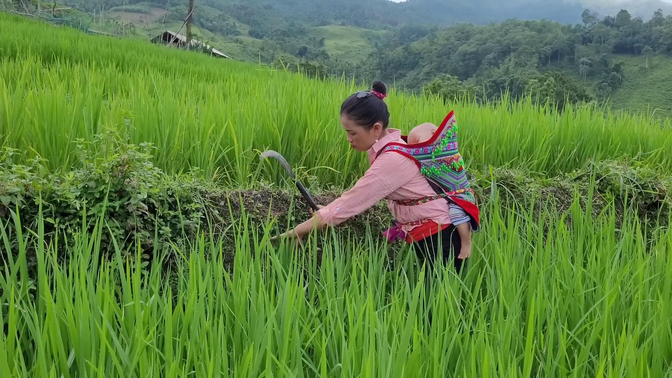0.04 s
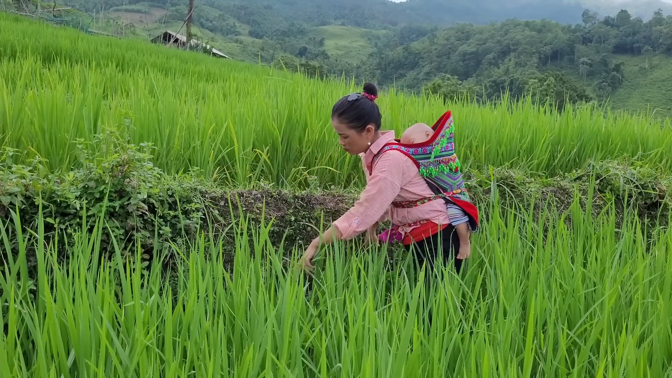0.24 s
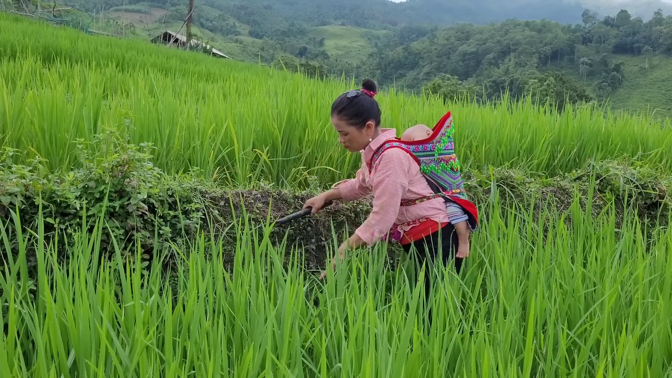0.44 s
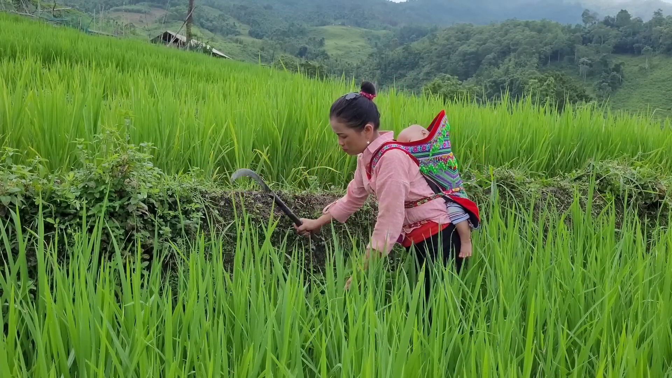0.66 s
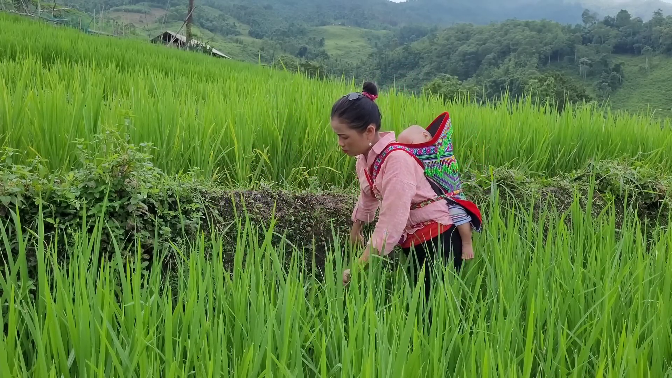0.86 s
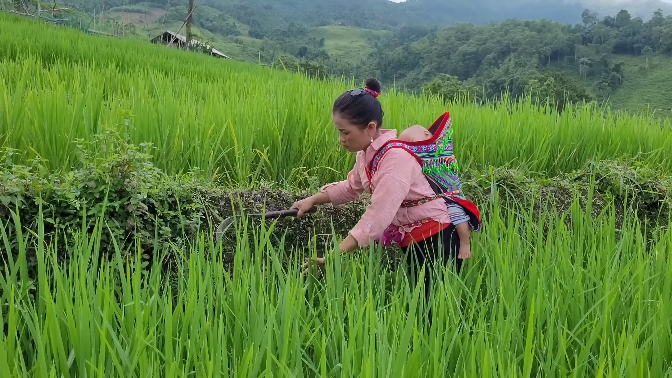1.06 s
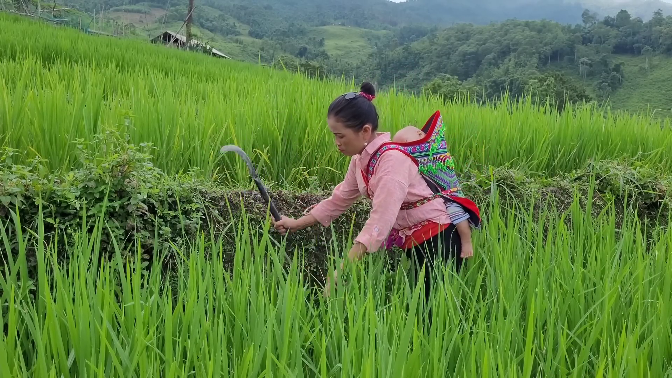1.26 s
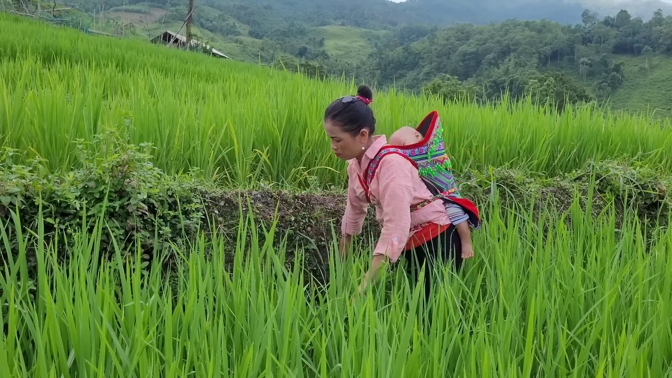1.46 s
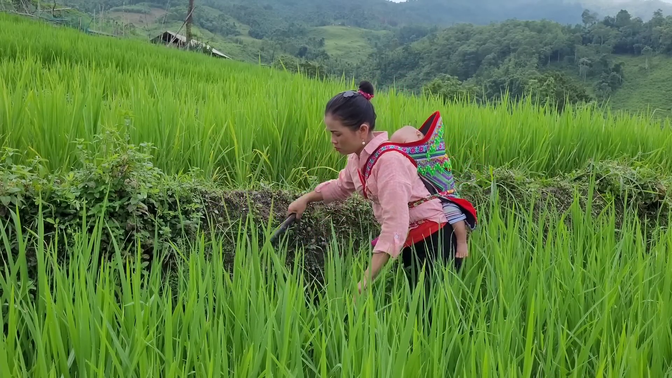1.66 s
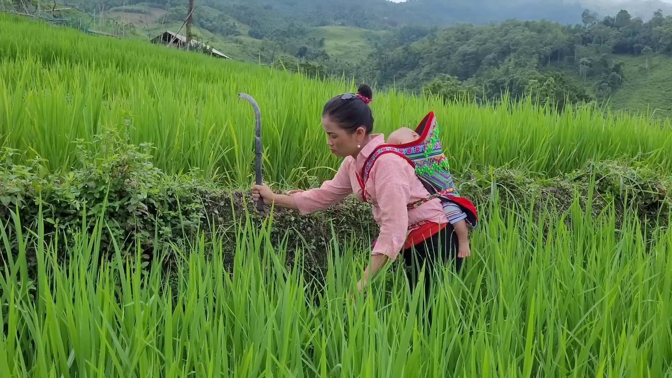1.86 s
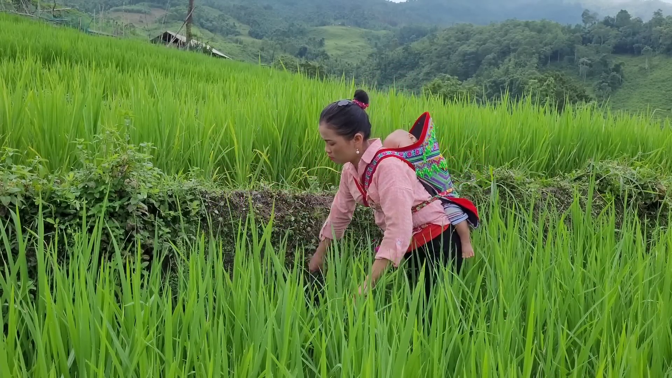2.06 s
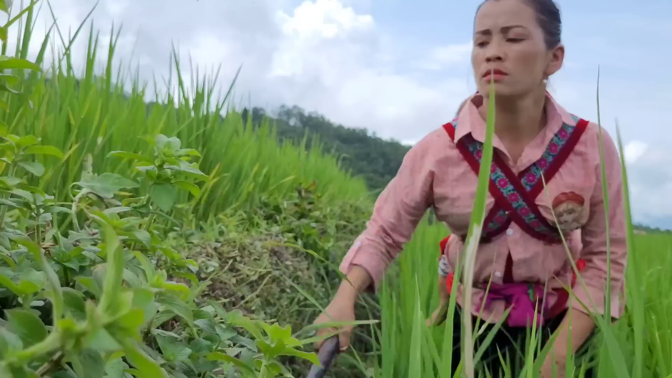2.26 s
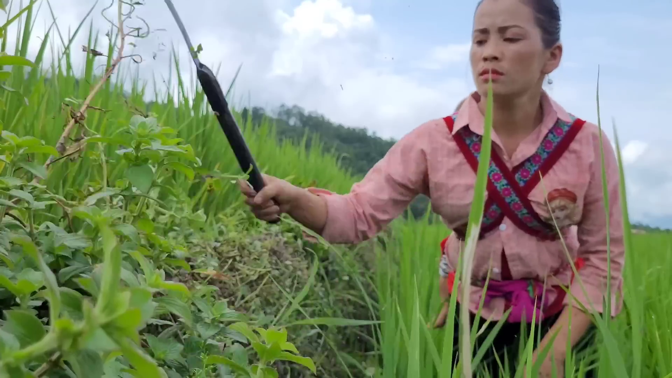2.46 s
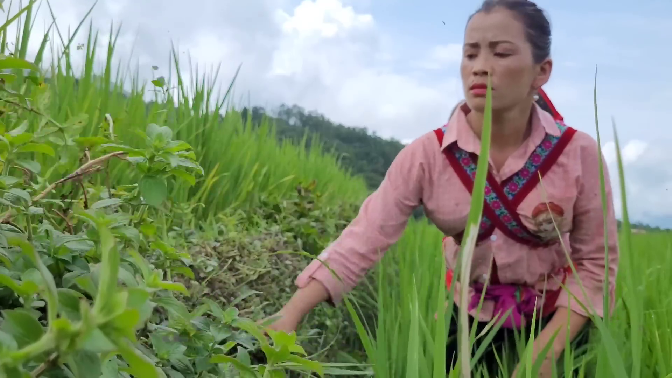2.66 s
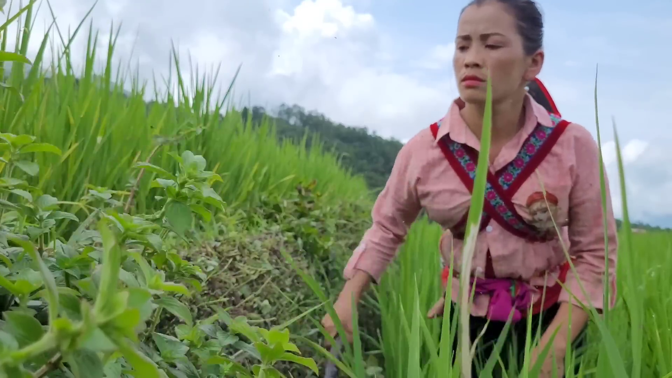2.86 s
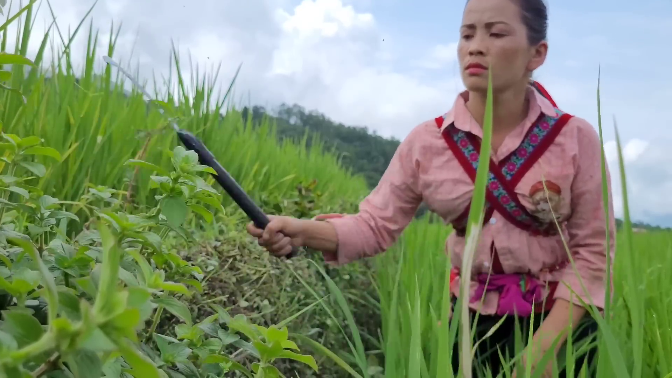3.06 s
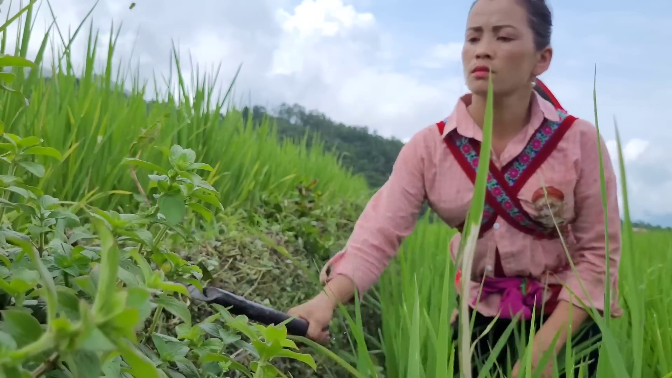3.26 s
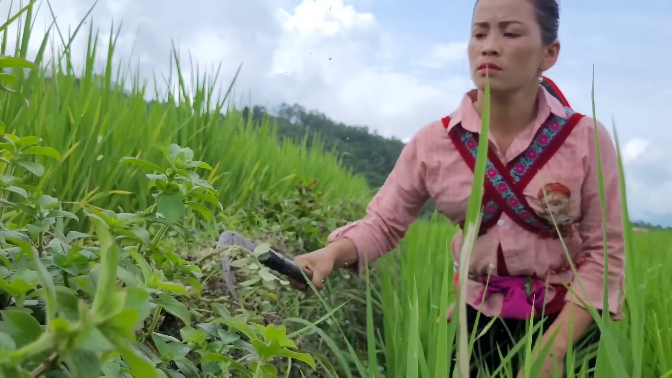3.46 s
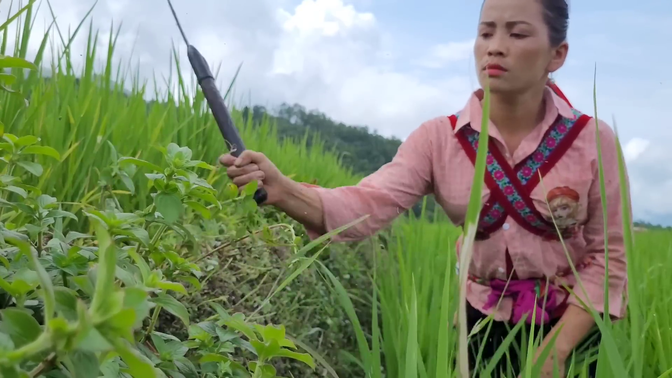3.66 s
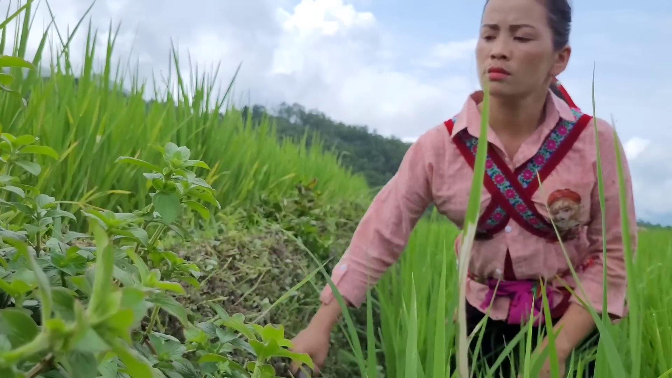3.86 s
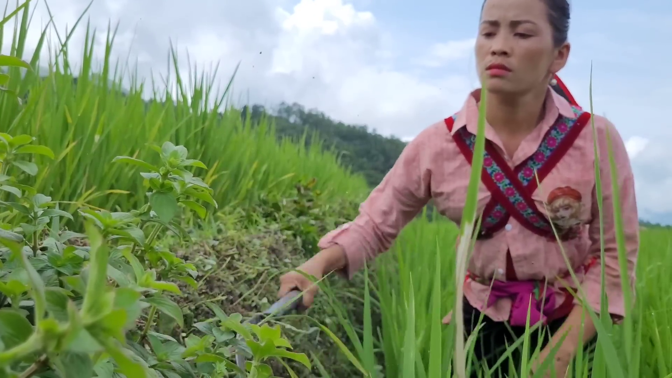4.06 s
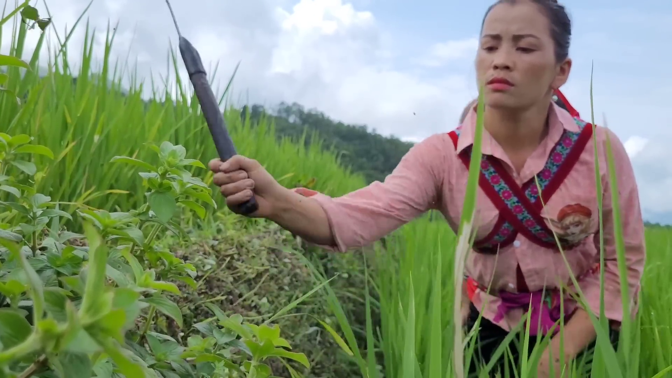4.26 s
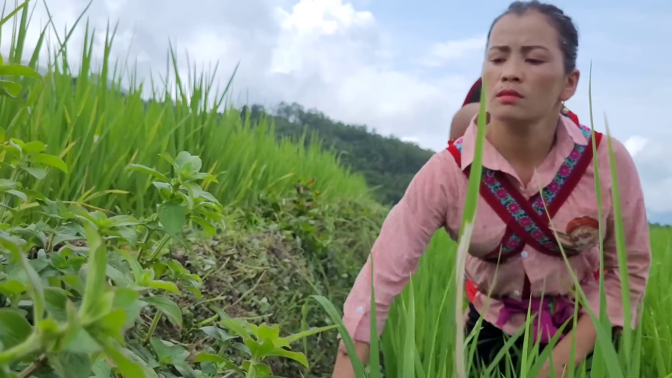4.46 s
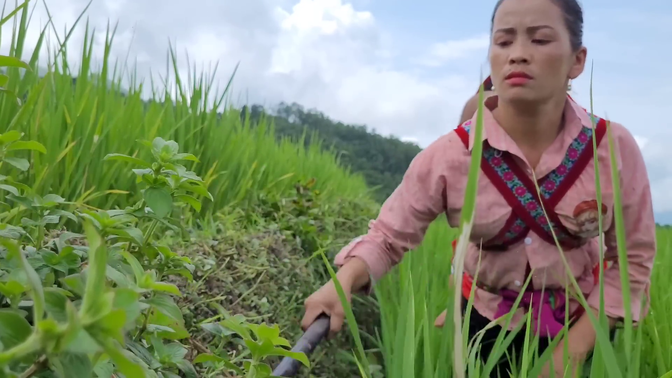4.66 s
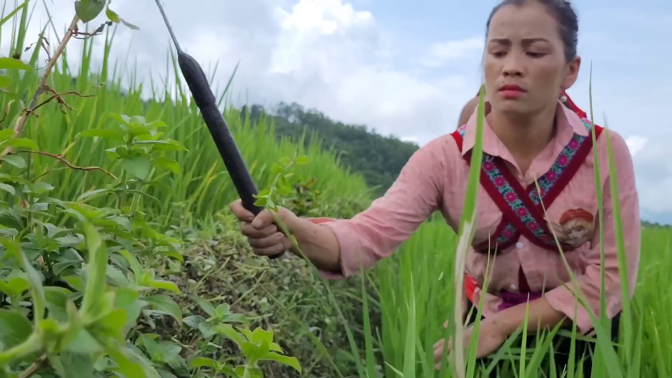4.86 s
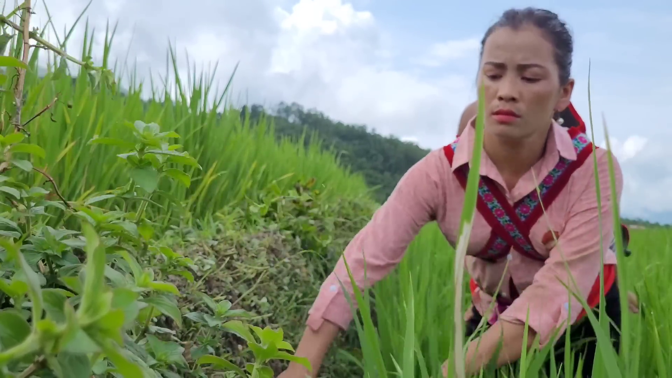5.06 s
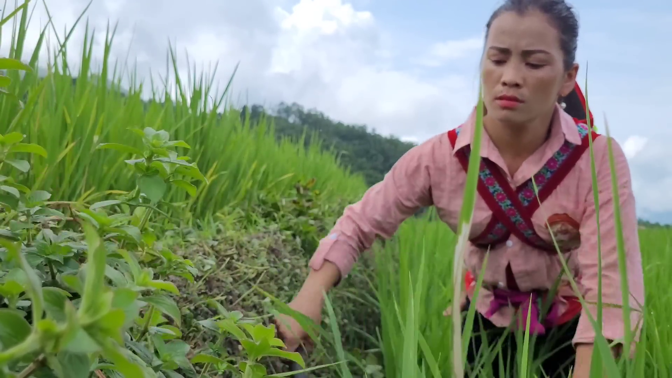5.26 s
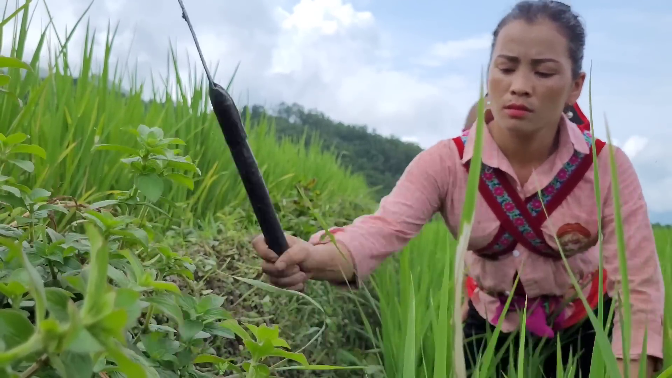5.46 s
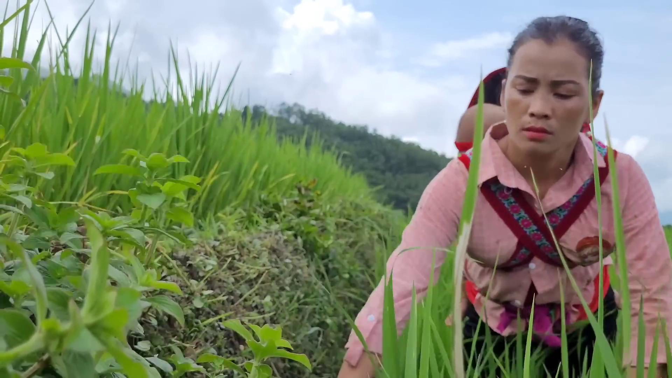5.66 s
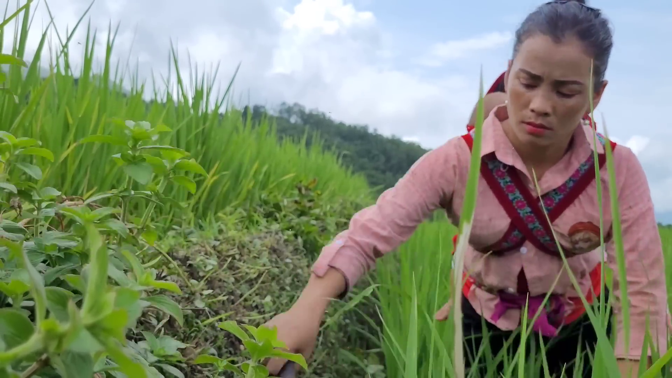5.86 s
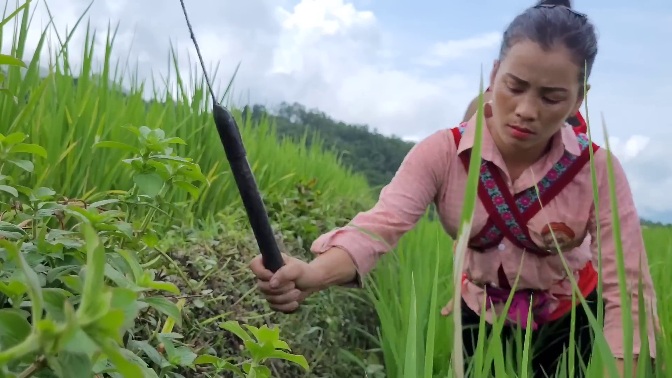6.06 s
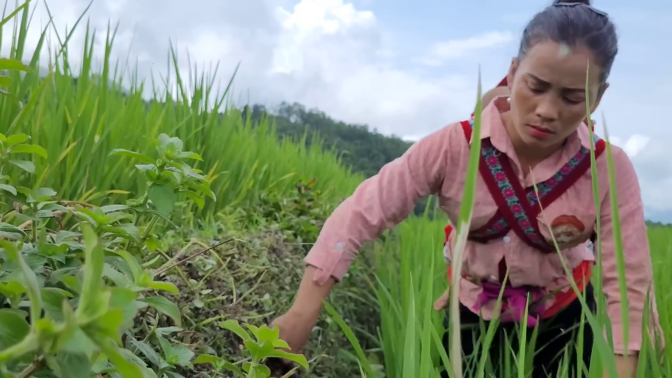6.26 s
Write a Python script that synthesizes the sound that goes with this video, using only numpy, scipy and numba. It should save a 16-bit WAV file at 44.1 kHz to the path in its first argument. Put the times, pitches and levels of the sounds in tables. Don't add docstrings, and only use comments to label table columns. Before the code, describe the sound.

Steady blade strokes rip through stems beside a flooded field. Each is a sharp, short tearing crunch of many tiny snaps, often with a brief metallic ping, followed by leaves settling. After about two seconds a cut brings the microphone near; strokes become brighter, low puffs of air bump it, mud sloshes, drops plop, and a small bird chirps faintly in the open, dry air.

```python
import sys
import numpy as np
from scipy import signal
from scipy.io import wavfile
from scipy.ndimage import uniform_filter1d
from numba import njit

SR = 44100
rng = np.random.default_rng(int(sys.argv[2]) if len(sys.argv) > 2 else 0)


def convert_level_to_amplitude(level_db):
    exponent = np.asarray(level_db, float) / 20
    return 10 ** exponent


def master(y):
    cut = np.clip(np.atleast_2d(y).T, -1, 1)
    pcm = np.round(cut * 32767)
    wavfile.write(sys.argv[1], SR, pcm.astype(np.int16))


N = 278271

CHANGE_S = 2.4
NEAR = np.arange(N) > CHANGE_S * SR
# start_s, peak_db, pitch_hz, eddies_db (rms of the eddies after it)
THUMPS = [(0.188, -42, 103, -62), (.823, -53, 99.6, -59), (1.433, -40, 70, -66), (2.049, -54, 89.5, -61),
          (2.777, -44, 87, -46.5), (3.324, -27, 108.5, -41), (3.884, -19.5, 82, -50),
          (4.488, -30, 88.5, -40.5), (5.118, -38, 102, -42), (5.711, -23.5, 81, -44),
          (6.269, -29, 61.9, -50)]


def read(table, hz):
    f, v = np.transpose(table)
    return np.interp(np.log(hz), np.log(np.maximum(f, 1)), v)


def walk(rate_hz):
    k = int(SR / rate_hz)
    held = np.repeat(rng.standard_normal(N)[:N // k + 1], k)
    return 1.114 * uniform_filter1d(held, k)[:N]


def swell(start_s, rise_ms, t60_s, hold_s=0.0):
    sag_db_per_s = 36
    i, rise_s = int(start_s * SR), rise_ms / 1000
    u = np.arange(min(int((rise_s + hold_s + t60_s) * SR), N - i)) / SR
    sag_db = sag_db_per_s * np.clip(u - rise_s, 0, hold_s)
    decay_db = 60 * np.maximum(u - rise_s - hold_s, 0) / t60_s
    rise = np.sin(np.pi / 2 * np.clip(u / rise_s, 0, 1)) ** 1.14
    return i, rise * convert_level_to_amplitude(-sag_db - decay_db)


def pile(rows, base):
    power = base + np.zeros(N)
    for start_s, db, *form in rows:
        i, shape = swell(start_s, *form)
        power[..., i:i + len(shape)] += (convert_level_to_amplitude(db) * shape) ** 2
    return power


def stir():
    field_far = (-65, -53.5, -59.5)
    field_near = (-57.5, -58, -59.5)
    # start_s, high_band_db (rms), rise_ms, t60_s
    rustles = [(.17, -44.5, 50, 1.05), (.36, -45.5, 37, 2.8), (.58, -45, 160, 2.2), (.8, -44.5, 120, 1.9),
               (.96, -46.5, 80, 1.2), (1.1, -48.5, 100, 1.8), (1.26, -46, 91, 2), (1.42, -47, 110, 0.81),
               (1.55, -49, 126, 0.36), (2.35, -47, 16, 0.18), (2.03, -41, 70, 0.71), (2.405, -43, 38, 1.33),
               (2.62, -48, 60, 1.4), (2.77, -36.5, 55, 0.57), (2.93, -49.5, 140, 0.38),
               (3.245, -46, 52, 0.13), (3.32, -40.5, 59, 0.94), (3.45, -52.5, 160, 3.2),
               (3.89, -36.5, 83, 1.22), (4.3, -48, 69, 1.1), (4.49, -29, 55, 0.62), (4.6, -40.5, 165, 3),
               (4.8, -46.5, 160, 1.8), (5.12, -28, 45, 0.99), (5.23, -36, 116, 0.95), (5.55, -46, 220, 1.1),
               (5.72, -33, 69, 0.78), (6.27, -37, 40, 1.1)]
    # start_s, level_db (rms), rise_ms, t60_s
    sloshes = [(0., -54.5, 76, 4.6), (.95, -71, 100, 0.55), (1.62, -53, 40, 1.9), (1.9, -58, 17, 0.69),
               (2.41, -46, 46, 1.3), (2.6, -48, 120, 2.1), (3.15, -56.5, 47, 1.5), (3.5, -57, 66, 2.6),
               (3.8, -49.5, 100, 1.4), (4.03, -47, 88, 0.73), (4.3, -55, 73, 1.5), (4.7, -50.5, 37, 0.97),
               (4.95, -54, 62, 1.5), (5.5, -51.5, 47, 1.3)]
    leaf_low_db, leaf_middle_db = -11, -4
    eddy_rise_ms, eddy_t60_s, breeze_db = 20, 0.41, -65.5
    pause_s, pause_depth_db = 0.031, -8.5

    field_db = np.where(NEAR, np.array(field_near)[:, None], np.array(field_far)[:, None])
    leaves = pile(rustles, 0) * convert_level_to_amplitude(2 * np.array([[leaf_low_db], [leaf_middle_db], [0]]))
    leaves[0] += pile(sloshes, 0)
    t = np.arange(N) / SR
    pause_db = pause_depth_db * np.exp(-((t - CHANGE_S + pause_s) / pause_s) ** 2)
    rows = [(s, db, eddy_rise_ms, eddy_t60_s) for s, _, _, db in THUMPS]
    eddies = pile(rows, convert_level_to_amplitude(2 * breeze_db))
    leaf_db = 10 * np.log10(convert_level_to_amplitude(2 * field_db) + leaves) + pause_db
    return leaf_db, 10 * np.log10(eddies) + pause_db


def bird():
    # start_s, length_s, start_hz, end_hz, level_db (rms)
    peeps = [
        (2.45, 0.061, 4770, 4860, -52),
        (3.407, 0.018, 4900, 4650, -43),
        (4.224, 0.12, 4560, 4700, -53),
        (4.415, .02, 4640, 4800, -50),
        (4.462, 0.022, 4700, 4900, -44),
        (4.377, 0.019, 4500, 4550, -53),
        (4.456, .009, 2300, 2200, -48),
        (5.04, .03, 4600, 4750, -54),
        (5.572, .05, 4370, 4770, -54),
        (5.655, .02, 4540, 4700, -54),
    ]
    out = np.zeros(N)
    for start_s, length_s, start_hz, end_hz, db in peeps:
        i, u = int(start_s * SR), np.arange(int(length_s * SR)) / (length_s * SR)
        hz = end_hz + (start_hz - end_hz) * (1 - u) ** 2
        tone = np.sin(2 * np.pi * np.cumsum(hz) / SR)
        out[i:i + len(u)] += convert_level_to_amplitude(db) * np.sqrt(2 * np.sin(np.pi * u)) * tone
    return out * convert_level_to_amplitude(np.array([[-2.5], [2.5]]))


def air(air_db):
    low_hz, top_hz, unlike = 45, 110, 0.29
    rise_ms, t60_s = 20, 0.15
    sag_per_s, noise_share = 3.8, 0.25
    band = signal.butter(2, [low_hz, top_hz], "band", fs=SR, output="sos")
    mid, side = signal.sosfilt(band, rng.standard_normal((2, N)))
    gust = (mid + unlike * side * np.array([[1], [-1]])) / np.std(mid)
    out = gust * convert_level_to_amplitude(air_db + 2.0)
    for start_s, db, pitch_hz, _ in THUMPS:
        i, shape = swell(start_s, rise_ms, t60_s)
        span = slice(i, i + len(shape))
        hz = pitch_hz * np.exp(-sag_per_s * np.arange(len(shape)) / SR)
        push = np.sin(2 * np.pi * np.cumsum(hz) / SR) + noise_share * gust[:, span]
        out[:, span] += convert_level_to_amplitude(db - 4.5) * shape * push
    return out * convert_level_to_amplitude(np.array([[-0.6], [0.6]]))


def drops():
    # start_s, peak_db, pitch_hz, t60_s
    plops = [(.082, -40, 686, 0.042), (1.264, -37, 2720, .03), (1.825, -36, 1490, 0.017),
             (1.909, -34, 1790, 0.02), (2.2115, -32, 682, 0.093), (2.365, -42, 1260, 0.046),
             (2.685, -40, 1490, 0.056), (2.857, -23.5, 756, 0.09), (2.899, -41, 536, 0.13),
             (3.145, -29.5, 1330, 0.012), (3.286, -39, 1580, 0.032), (3.643, -36.5, 1660, 0.036),
             (3.819, -34.5, 1450, 0.04), (4.386, -39, 1530, .055), (4.399, -35.5, 2170, 0.028),
             (4.817, -47, 1900, .049), (4.874, -27, 2270, 0.017), (4.962, -38, 2420, .065),
             (5.011, -39, 2600, 0.12), (5.248, -21.5, 1010, .022), (5.834, -26, 1414, .04),
             (3.835, -36, 315, 0.087), (6.044, -43, 560, .06), (6.131, -49, 1400, .06)]
    pan_db, glide = -6.5, 0.061
    out = np.zeros(N)
    for start_s, db, hz, t60_s in plops:
        i, shape = swell(start_s, 2.6, t60_s)
        u = np.arange(len(shape)) / SR
        ringing = np.sin(2 * np.pi * hz * (u + glide * u ** 2 / t60_s))
        out[i:i + len(u)] += convert_level_to_amplitude(db - 3.0) * shape * ringing
    return out * convert_level_to_amplitude(np.array([[pan_db], [-pan_db]]) / 2)


def cracks():
    # start_s, peak_db, pitch_hz
    splits = [(2.0612, -5, 4100), (2.0625, -11, 3300), (3.8865, -10, 5800), (3.922, -15, 1400),
              (3.903, -14, 500), (5.7138, -9, 4900), (5.7138, -11, 1100), (5.7238, -10, 4700),
              (5.7238, -10, 1300), (5.741, -10, 500), (5.708, -14, 1000), (5.7605, -13, 700),
              (3.3245, -13, 900), (3.328, -14, 1000), (3.3245, -17, 5400), (4.4785, -11, 2500),
              (4.501, -7, 450), (4.508, -9, 2100), (4.5205, -9, 500), (4.521, -12, 2200),
              (2.7655, -10, 1500), (2.0315, -12, 900), (.1838, -15, 2700), (.1975, -17, 320),
              (.8005, -19, 2850), (.8318, -16, 3300), (.8348, -16, 1200), (.846, -17, 3900),
              (1.4052, -15, 1360), (1.411, -14, 3100), (1.4275, -13, 5700), (1.4412, -11, 3200),
              (1.4405, -14, 800), (1.452, -16, 700), (5.104, -12, 500), (5.113, -9, 4100),
              (5.126, -12, 2350), (6.2735, -12, 600), (6.2862, -11, 2100), (6.293, -12, 900)]
    pan_db, rise_ms, t60_s = -1.0, 0.3, 0.005
    out = np.zeros(N)
    for start_s, db, hz in splits:
        i, shape = swell(start_s, rise_ms, t60_s)
        swing = np.sin(2 * np.pi * hz * np.arange(len(shape)) / SR)
        out[i:i + len(shape)] -= convert_level_to_amplitude(db) * shape * swing
    return out * convert_level_to_amplitude(np.array([[pan_db], [-pan_db]]) / 2)


def blade():
    # start_s, peak_db, pitch_hz, t60_s
    pings = [(0.181, -13, 2670, 0.045), (0.8305, -24, 3600, 0.025), (1.424, -6, 2700, 0.025),
             (1.437, -4, 2930, 0.025), (2.0303, -13, 3100, 0.018), (2.0594, -8, 7450, 0.02),
             (2.0602, -2, 3660, 0.037), (2.7282, -25, 4630, 0.025), (3.8854, -11, 5660, 0.028),
             (4.4835, 2.5, 6030, 0.024), (4.4895, -3, 5900, 0.02), (5.112, 3.5, 6110, 0.034),
             (6.2726, -21, 4130, 0.025)]
    pan_db, spread = 1.5, 0.058
    out = np.zeros(N)
    detunes = rng.standard_normal((len(pings), 3, 1))
    for (start_s, db, hz, t60_s), detune in zip(pings, detunes):
        i, shape = swell(start_s, 0.3, 0.93 * t60_s)
        u = np.arange(len(shape)) / SR
        modes = np.sin(2 * np.pi * hz * (1 + spread * detune) * u)
        out[i:i + len(shape)] += convert_level_to_amplitude(db - 13.5) * shape * modes.sum(axis=0)
    return np.array([out * convert_level_to_amplitude(pan_db / 2), np.roll(out, 5) * convert_level_to_amplitude(-pan_db / 2)])


def tearing():
    # start_s, peak_db, hold_s (time in the weeds), t60_s, low_db (re middle band)
    strokes = [(0.171, -19.5, 0.018, 0.27, -6.5), (0.781, -21.5, 0.068, 0.088, -10.5),
               (1.4, -15.5, 0.064, 0.14, -8.5), (2.028, -15, 0.026, 0.076, -2.5),
               (2.754, -10.5, 0.025, 0.23, -5.5), (3.318, -17, 0.007, 0.025, -5),
               (3.879, -11, 0.0043, 0.18, -4.5), (4.475, -8.5, 0.036, 0.084, -5),
               (5.098, -13, 0.047, 0.31, -5), (5.701, -13.5, 0.051, 0.17, -4), (6.264, -9, 0.017, 0.17, -6)]
    # start_s, peak_db, low_db, high_db (re middle band)
    bunches = [(0.153, -29, -2, -6), (.166, -30, -10, -1), (0.203, -23, -8, -4), (5.09, -25, -10, -3),
               (2.745, -28, -8, 2), (0.191, -18, -10, -9), (0.417, -29, -11, -8), (0.8, -17, -19, -5),
               (0.824, -17.5, -0.5, -8), (1.423, -13, -6.5, -1), (1.452, -29, -12, -3),
               (2.031, -20, 2, 8.5), (2.109, -25, -3.5, -9), (2.411, -38.5, -11, 2), (2.724, -25, -2, 3.5),
               (2.762, -8, -3, 3), (2.782, -12, -18, -5), (3.022, -40.5, 0, 9.5), (3.309, -29, -2, -2),
               (3.3225, -15, 2, 0), (5.694, -32, -3, 0), (3.44, -31.5, -1, 5.5), (3.9, -26, -2, -6),
               (3.914, -22, -1, -8), (3.876, -30, -3, -3), (4.495, -8, -1.5, 4), (5.106, -11.5, 0, 3.5),
               (5.121, -7.5, -7, -4), (5.164, -20, -15, 1), (5.193, -18, -18, 4), (5.711, -12.5, 0, 3.5),
               (5.737, -13.5, -2.5, 2), (5.764, -23.5, -5, 7), (6.236, -35, -6, 8), (6.243, -25.5, -3, 4),
               (6.252, -21, -6, -3), (6.29, -16, -9, 0)]
    # start_s, peak_db, low_db, high_db (re middle band)
    ticks = [(0.181, -13.5, -11, -6), (2.212, -46, -9, -8), (2.7635, -18, -11, 0), (3.839, -39, -7, 4),
             (4.477, -13, -8, 0), (5.41, -24.5, -4.5, -4), (5.47, -37, -2, 12.5), (5.2, -26, -6, 0),
             (5.3, -30, -5, 0), (5.355, -30, -8, 0), (4.7, -34, -8, 2), (4.775, -34, -8, 2),
             (6.2535, -23.5, -8, 5), (0.449, -26.5, -11, -3), (0.951, -30.5, 1, -27), (1.0162, -33, -1, 6),
             (1.783, -41, -21, 8.5), (1.9794, -49, -21, -8), (2.059, -6.5, -30, -2), (2.3638, -40.5, 0, 6),
             (2.533, -30.5, -2, 8), (3.1416, -36.5, -2, -2), (3.2714, -52, -9, -5), (3.699, -44, -12, 12),
             (4.143, -29, -7, 1.5), (4.41, -28, -22, -0.5), (4.819, -26.5, -19, -2), (4.964, -35, -8, 9)]
    far_high_db, near_high_db = -1.5, 0.5
    bite_ms, crest_db = 8.8, -9
    bunch_rise_ms, bunch_t60_s = 4.4, 0.12
    tick_rise_ms, tick_t60_s = 0.69, 0.058
    brush_db, brush_ms = -17, 3.8

    def bands(db, low_db, high_db):
        return db + crest_db + np.array([[low_db], [0], [high_db]])

    rows = []
    for start_s, db, hold_s, t60_s, low_db in strokes:
        high_db = near_high_db if start_s > CHANGE_S else far_high_db
        rows.append((start_s, bands(db, low_db, high_db), bite_ms, t60_s, hold_s))
    rows += [(s, bands(*levels), bunch_rise_ms, bunch_t60_s) for s, *levels in bunches]
    rows += [(s, bands(*levels), tick_rise_ms, tick_t60_s) for s, *levels in ticks]
    power = pile(rows, np.full((3, 1), 1e-14))
    keep = np.exp(-1000 / (brush_ms * SR))
    ahead = signal.lfilter([1 - keep], [1, -keep], power[:, ::-1])[:, ::-1]
    return 10 * np.log10(power + convert_level_to_amplitude(2 * brush_db) * ahead)


def shaped(colour, band_db, hz):
    # low_hz, high_hz
    bands_hz = [(150, 1000), (1000, 4000), (4000, 15500)]
    own_db = []
    for low_hz, high_hz in bands_hz:
        density = convert_level_to_amplitude(2 * read(colour, np.linspace(low_hz, high_hz, num=200)))
        own_db.append(10 * np.log10(np.mean(density) * (high_hz - low_hz)))
    lift_db = band_db - np.array(own_db)[:, None]
    place = np.interp(np.log(hz), np.log([600, 1500, 3000, 5500]), [0, 1, 1, 2])
    share = np.clip(1 - np.abs(place - np.arange(3)[:, None]), 0, 1)
    return read(colour, hz) + (share * lift_db).sum(axis=0)


@njit
def ring(start, pole, onset, left, right, floor):
    out = np.zeros((2, N))
    for k in range(len(start)):
        z, lack, i = 1 + 0j, 1., start[k]
        while i < N and z.real * z.real + z.imag * z.imag > floor:
            out[0, i] += (1 - lack) * (z * left[k]).imag
            out[1, i] += (1 - lack) * (z * right[k]).imag
            z *= pole[k]
            lack *= onset[k]
            i += 1
    return out


def weeds(leaf_db):
    # pitch_hz, density_db (per Hz)
    tear_far, tear_near = [(59, -37), (100, -22), (259, -1.5), (441, -24), (764, -6.5), (1860, -5),
                           (2110, -10), (3160, -1.5), (6490, -2.5), (12000, -3.5), (15800, -8.5)], [(59, -37), (100, -14.5), (271, 7.5), (832, -2), (965, -10),
                                             (1470, -11), (2250, -12.5), (3160, -20), (3440, -12),
                                             (5960, -13), (6630, -16.5), (14800, -14), (15800, -40)]
    leaf_far, leaf_near = [(59, -40), (100, 3.5), (219, 9), (748, 3), (965, -9), (1820, -10), (2160, -16),
                           (2840, -9.5), (6630, -17.5), (12500, -17.5), (15800, -23)], [(59, -42), (100, -24), (249, -4), (396, -13), (780, -8.5),
                                             (1030, -34), (1220, -5), (2350, -5.5), (2960, -6.5),
                                             (4620, -7), (9500, -12.5), (12000, -5.5), (15800, -15.5)]
    # pitch_hz, balance_db (left minus right)
    pan_far, pan_near = [(60, -3), (110, -5), (200, 5), (380, -6), (700, -5.5), (1290, -2.5), (2380, -0.5),
                         (4400, -4), (8120, 1.5), (15000, 0.5)], [(60, -3), (110, -5), (200, 4.5), (380, -1.5), (700, 0),
                                          (1290, -3.5), (2380, -5), (4400, -4.5), (8120, 1.5),
                                          (15000, -1.5)]
    snaps_per_s, cycles = 36000, 1.405
    tear_scatter_db, leaf_scatter_db = 1.5, 2.8
    crackle_db, flutter_db = 1.4, 1.0

    count = int(snaps_per_s * N / SR)
    when, pitch, odd, phase, long = rng.random((count, 5)).T
    side, wide = rng.standard_normal((count, 2)).T
    start, hz = (when * N).astype(np.int64), 100 + pitch * 15700
    near = NEAR[start]
    rare = np.minimum(-np.log(1 - odd), 2.8) - 1

    tear_db = tearing()[:, start]
    tear = np.where(near, shaped(tear_near, tear_db, hz), shaped(tear_far, tear_db, hz))
    tear += crackle_db * np.clip(walk(700), -1.8, 1.8)[start]
    fall_db = leaf_db[:, start]
    leaf = np.where(near, shaped(leaf_near, fall_db, hz), shaped(leaf_far, fall_db, hz))
    leaf += flutter_db * walk(60)[start]
    density = convert_level_to_amplitude(2 * (tear + tear_scatter_db * rare))
    density += convert_level_to_amplitude(2 * (leaf + leaf_scatter_db * rare + 2.0))

    tau_s = cycles * (0.5 + long) * (hz / 1000) ** 0.23 / hz
    size = np.sqrt(density * 15700 * 9 / (snaps_per_s * tau_s)) * np.exp(2j * np.pi * phase)
    lag_s = np.where(near, 1.1e-4, 4e-5) + 4e-5 * side + 9e-5 * walk(120)[start]
    pan_db = np.where(near, read(pan_near, hz), read(pan_far, hz))
    pan_db += 8.0 * wide * np.clip(hz / 2200, 0.05, 1)
    pan = convert_level_to_amplitude(pan_db / 2)
    pole = np.exp(2j * np.pi * hz / SR - 1 / (tau_s * SR))
    onset = np.exp(-3 / (tau_s * SR))
    left = size * pan * np.exp(2j * np.pi * hz * lag_s)
    return ring(start, pole, onset, left, size / pan, 1e-3)


def placed(x):
    low_hz, hollow_hz, hollow_width_hz = 130, 3300, 1100
    left_depth, right_depth = 0.068, 0.73
    slot_width_hz, slot_depth = 220, 0.35
    x = signal.sosfilt(signal.butter(3, low_hz, "high", fs=SR, output="sos"), x)
    hollow = signal.lfilter(*signal.iirpeak(hollow_hz, hollow_hz / hollow_width_hz, fs=SR), x)
    slots = np.zeros_like(x)
    for hz in (2950, 3680):
        slots += slot_depth * signal.lfilter(*signal.iirpeak(hz, hz / slot_width_hz, fs=SR), x)
    depth = np.clip(np.array([[left_depth], [right_depth]]) + 0.053 * walk(17), 0, 1)
    return x - (depth * hollow + (1 - depth) * slots) * NEAR


def ports(x):
    # port (0 left, 1 right), centre_hz, width_hz, share (removed; negative lifts)
    ports_far = [(1, 2320, 630, 0.41), (0, 3440, 810, 0.27), (0, 5260, 900, -0.38), (0, 6300, 1100, 0.53),
                 (0, 830, 920, 0.038), (1, 2000, 370, -0.18), (1, 5100, 1800, 0.27), (0, 250, 80, -.2),
                 (1, 250, 80, -.2), (0, 440, 150, .3), (0, 2150, 300, .2), (1, 1700, 400, -.2)]
    ports_near = [(1, 3100, 340, .35), (1, 4140, 770, 0.26), (0, 5700, 830, 0.54), (0, 1140, 360, -0.37),
                  (0, 3540, 380, -0.31), (0, 250, 70, -.4), (1, 250, 70, -.4), (0, 980, 200, .3),
                  (1, 980, 200, .35), (0, 9500, 2500, -.25)]
    out = x.copy()
    for rows, on in ((ports_far, ~NEAR), (ports_near, NEAR)):
        for port, hz, width_hz, share in rows:
            band = signal.lfilter(*signal.iirpeak(hz, hz / width_hz, fs=SR), out[port])
            out[port] -= share * on * band
    return out


def scene():
    leaf_db, air_db = stir()
    cut_weeds = ports(placed(weeds(leaf_db)))
    return bird() + air(air_db) + drops() + cracks() + blade() + cut_weeds


def starved(x):
    starved_hz = (2760, 2960, 3150, 3400, 3600, 3760, 3960, 4300)
    width_hz, rate_hz, threshold = 150, 20, 0.8
    for hz in starved_hz:
        edges_hz = [hz - width_hz / 2, hz + width_hz / 2]
        band = signal.butter(2, edges_hz, "band", fs=SR, output="sos")
        chance = walk(rate_hz) + 0.4 * np.array([walk(rate_hz), walk(rate_hz)])
        gate = np.clip(4 * (chance - threshold), 0, 1) * NEAR
        for _ in range(2):
            x = x - gate * signal.sosfiltfilt(band, x)
    return x


def band_limit(x):
    return signal.sosfilt(signal.butter(12, 16620, fs=SR, output="sos"), x)


def record(dry):
    rounded = 0.85 * np.tanh(dry / 0.95)
    low_cut = signal.butter(1, 45.0, "high", fs=SR, output="sos")
    top_cut = signal.ellip(8, 0.3, 60, 15750, fs=SR, output="sos")
    mix = starved(signal.sosfilt(np.vstack([low_cut, top_cut]), rounded))
    return band_limit(mix)


dry = scene()
out = record(dry)
master(out)
```